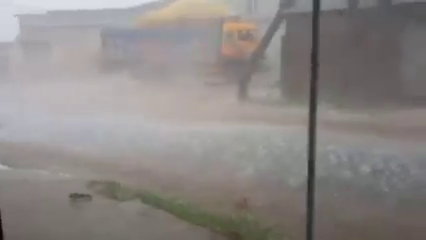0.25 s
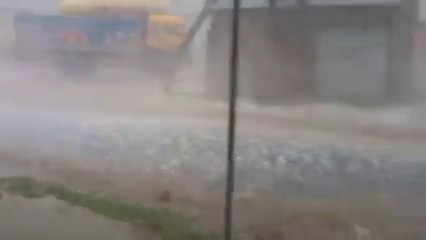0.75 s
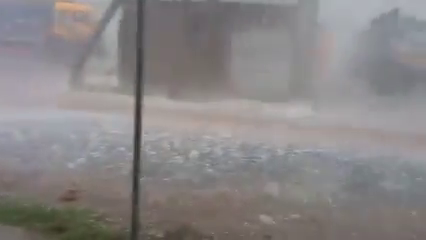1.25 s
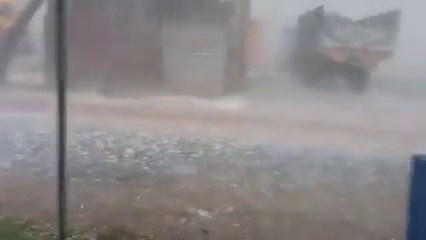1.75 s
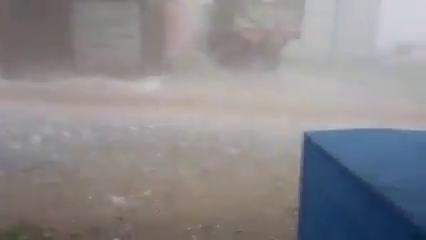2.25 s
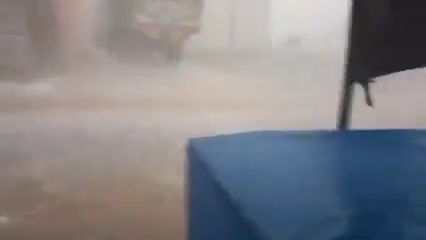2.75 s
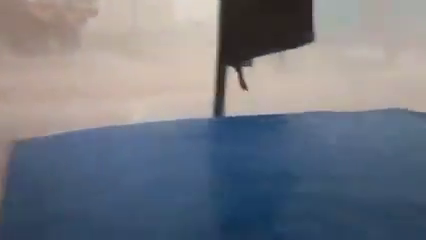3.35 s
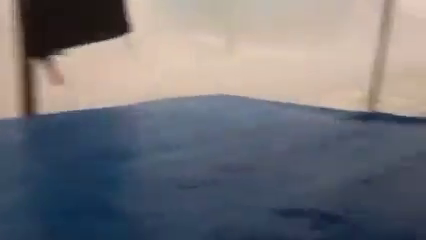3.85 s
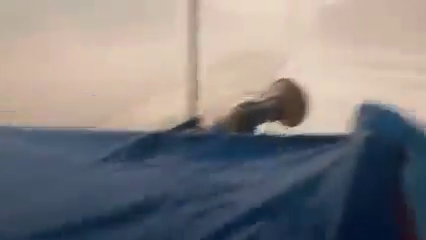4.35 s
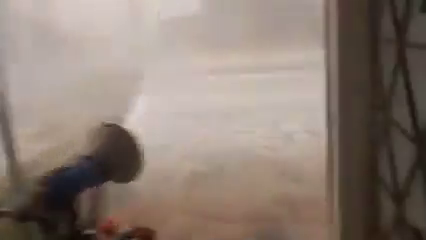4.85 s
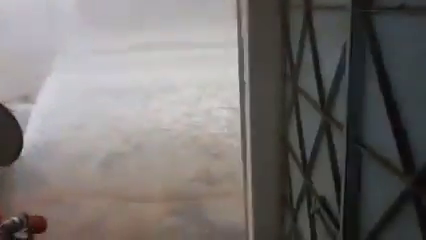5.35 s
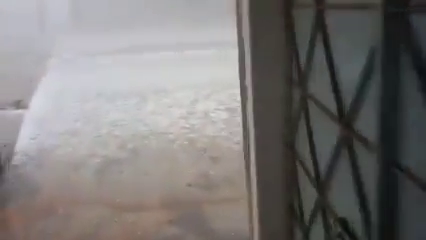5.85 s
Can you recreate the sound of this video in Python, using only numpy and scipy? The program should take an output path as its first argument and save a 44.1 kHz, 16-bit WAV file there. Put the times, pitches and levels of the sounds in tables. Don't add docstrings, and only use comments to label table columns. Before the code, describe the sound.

Torrential hail and rain roar on a yard and sheet roof, with dull knocks, sharp icy cracks and wind buffeting the microphone.

```python
import sys
import numpy as np
from scipy import signal
from scipy.fft import rfft, irfft, dct, next_fast_len
from scipy.io import wavfile
from scipy.ndimage import uniform_filter1d, minimum_filter1d

SR = 44100
rng = np.random.default_rng(int(sys.argv[2]) if len(sys.argv) > 2 else 0)


def gain_from_db(level_db):
    decades = np.asarray(level_db, float) / 20
    return 10 ** decades


def int16_out(signal):
    q = np.round(np.clip(np.atleast_2d(signal).T, -1, 1) * 32767)
    wavfile.write(sys.argv[1], SR, q.astype(np.int16))


N = 268128
PADDED = next_fast_len(N + SR // 8)
HZ = np.maximum(np.fft.rfftfreq(PADDED, 1 / SR), 1)

# [f/Hz, density/dB per Hz]
ROAR_COLOUR = [(88, -40), (150, -6), (174, -8), (246, -5), (364, -3), (929, -6), (1250, -3.5), (1520, -2),
               (1760, -2.5), (2040, -2), (2370, -5.5), (3450, -12.5), (7600, -21), (9880, -51.5),
               (16700, -120)]


def rms_one(x):
    return x / np.sqrt(np.mean(x ** 2) + 1e-20)


def in_time(rows):
    s, *columns = np.transpose(rows)
    return [np.interp(np.arange(N) / SR, s, c) for c in columns]


def at_hz(points, hz):
    table = np.array(points)
    return np.interp(np.log(hz), np.log(table[:, 0]), table[:, 1])


def shaped(x, gain):
    return irfft(rfft(x, PADDED) * gain, PADDED)[..., :N]


def panned(pan_db):
    return gain_from_db(np.multiply.outer([.5, -.5], pan_db))


def drift(rate_hz):
    pole = np.exp(-80 * np.pi * rate_hz / SR)
    noise = rng.standard_normal(N // 40 + 2002)
    slow = signal.lfilter([1], [1, -2 * pole, pole * pole], noise)[2000:]
    return np.interp(np.arange(N) / 40, np.arange(len(slow)), rms_one(slow))


def impacts(per_s, spread_db, channels):
    size_db = spread_db * np.minimum(rng.exponential(1, (channels, N)), 4)
    sign = rng.choice([-1, 1], (channels, N))
    struck = rng.random((channels, N)) < per_s / SR
    return gain_from_db(size_db) * sign * struck


def roof_db():
    # [f/Hz, width/Hz, lift/dB]
    resonances = [(1545, 160, 3.5), (2062, 80, 4), (252.6, 21, 2.5)]
    return sum(db / (1 + (2 * (HZ - hz) / width) ** 2) for hz, width, db in resonances)


def far_field(colour_db, per_s, spread_db, together, shared_db, own_db, flicker_hz):
    # [f/Hz, left-right likeness]
    likeness = [(60, 0.37), (130, 0.15), (290, 0.16), (640, 0.41), (1410, -0.12), (3100, 0.048),
                (6820, -0.056), (15000, 0.33)]
    # [f/Hz, left-right/dB]
    lean = [(60, 0), (110, -1.5), (200, -5), (380, -1), (700, 0.5), (1290, -2), (2380, -7), (4400, -3.5),
            (8120, 1.5), (15000, -5.5)]
    hits = rfft(impacts(per_s, spread_db, channels=2), PADDED)
    alike = np.clip(at_hz(likeness, HZ), -.9, .9)
    common = np.sqrt(1 + alike) * hits[0]
    opposed = np.sqrt(1 - alike) * hits[1] * [[1], [-1]]
    pair = (common + opposed) * gain_from_db(colour_db) * panned(at_hz(lean, HZ))
    place, out = 1.2 * np.log2(HZ / 20), 0
    for k in range(13):
        band = np.cos(np.pi / 2 * np.clip(place - k, -1, 1)) ** 2
        if np.max(colour_db[band > .5], initial=-99) > -45:
            swell_db = shared_db * together * (k / 10) ** 2 + own_db * drift(flicker_hz)
            out = out + irfft(pair * band, PADDED)[:, :N] * gain_from_db(swell_db)
    return rms_one(out)


def downpour(roar_db, pan_db, spray_db):
    # [f/Hz, density/dB per Hz]
    spray_colour = [(7550, -34), (7700, 3.5), (10500, -0.5), (10900, 0.5), (12500, 3), (15050, -1.5),
                    (15200, -2.5), (15750, -7), (15800, -70)]
    sheets = drift(13.0)
    roar = far_field(at_hz(ROAR_COLOUR, HZ) + roof_db(), per_s=14000, spread_db=2.5, together=sheets,
                     shared_db=0.88, own_db=0.78, flicker_hz=12.0)
    spray = far_field(at_hz(spray_colour, HZ), per_s=16000, spread_db=-1.5, together=sheets,
                      shared_db=0.8, own_db=1.6, flicker_hz=8.3)
    roar = gain_from_db(roar_db + 3.5) * roar * panned(pan_db + 2.5)
    return roar + gain_from_db(spray_db) * spray * panned(0.49 * pan_db - 0.6)


def wind(swing_db):
    # [f/Hz, density/dB per Hz]
    rumble_colour = [(13, -59), (22, -34), (92, 6.5), (129, 6), (173, -5), (249, -1), (400, -3.5),
                     (520, -19.5), (880, -120)]
    # [t/s, peak level/dB, left-right/dB, centre f/Hz]
    gusts = [(0.399, -11, 3.5, 358), (0.817, -11, 3.5, 370), (1.217, -17.5, -5.0, 231),
             (2.437, -13, -5, 388), (3.089, -17, -6.0, 275), (3.601, -12, -6, 410), (3.827, -8.5, 1.5, 109),
             (3.948, -10, 8, 132), (4.019, -9.5, 1.5, 431), (4.22, -13.5, 0, 225), (4.341, -12, 1.0, 105),
             (4.619, -14.5, -5, 393), (4.892, -13.5, -4, 275), (5.093, -10, 1.0, 380),
             (5.169, -13, 2.5, 345), (5.381, -9, -3, 643), (5.757, -16, -6.5, 153), (5.997, -13, 4.0, 310)]
    rise_s, fall_s = 0.016, .045
    span = 1.7
    under_peak_db = 8.5
    steady = gain_from_db(-25.5 + .8 * swing_db) * panned(-1.7 + 3.0 * drift(5.0))
    rumble = far_field(at_hz(rumble_colour, HZ), per_s=3000, spread_db=2.5, together=drift(8.0),
                       shared_db=3.5, own_db=0.2, flicker_hz=9.0)
    out = np.pad(steady * rumble, ((0, 0), (0, SR)))
    t = np.arange(SR // 4) / SR - 2 * rise_s
    shape = np.exp(-(t / np.where(t < 0, rise_s, fall_s)) ** 2)
    for s, peak_db, pan_db, hz in gusts:
        band = signal.butter(2, [hz / span, hz * span], "band", fs=SR, output="sos")
        puff = rms_one(signal.sosfilt(band, rng.standard_normal((2, len(t))))) * shape
        start = int((s - rise_s) * SR)
        out[:, start:start + len(t)] += puff * gain_from_db(peak_db - under_peak_db) * panned(pan_db)[:, None]
    return out[:, :N]


def ringing(clicks, t60):
    return signal.lfilter([1], [1, -gain_from_db(-60 / (t60 * SR))], clicks + 1e-12)


def near_stones(patter_db):
    # [t/s, crack peak level/dB, knock above crack/dB, left-right/dB]
    stones = [(0.233, -18.5, 15, -2), (0.415, -15.5, 1, 1), (1.156, -26, 12.5, 4), (1.2434, -27.5, 11, 5),
              (1.3862, -26, 22.5, -3.5), (1.5534, -15.5, 1, 1), (2.4128, -20, 15, -5),
              (3.5276, -18, 11.5, -4), (3.704, -16, 4.5, -2.5), (3.8018, -14, -3, -0.5),
              (4.3032, -23, 10, -4), (4.381, -22, 12, -4), (4.736, -20.5, 5, -1), (4.8526, -19.5, 5, 1),
              (4.9014, -21, 11, -8), (4.965, -18, 16.5, -2), (5.01, -20.5, 12, 1), (5.103, -19, 17, -4.5),
              (5.177, -22, 18.5, 0), (5.303, -23, 3, -8), (5.378, -23.5, 17.5, 1), (5.4165, -19.5, 15, 1),
              (5.4929, -22.5, 10, -13), (5.7114, -19.5, 6, -4.5), (5.7542, -13.5, 8, -1),
              (5.79, -21.5, 10.5, -5), (5.9104, -15, 10.5, 1), (5.9589, -22, 19, 0.5), (5.9798, -19, 5, -3),
              (5.995, -15, 5, -1)]
    # [t/s, peak level/dB, left-right/dB]
    heavy_stones = [(0.197, -3, -8), (1.234, -7, -9), (1.348, -5, -3), (1.425, -5, -6.5), (1.607, -1, -5.5),
                    (1.72, -5, -4), (1.813, -6, 4), (1.923, -10, -1), (2.041, -3.5, -3), (2.125, -7.5, 3),
                    (2.32, -3.5, -1), (2.941, -4.5, -6), (3.474, -11, -6), (3.514, -13, 2),
                    (4.026, 1.5, -1), (4.09, -3, -4.5), (4.649, -8, -7), (4.738, -6, -6), (4.965, -3, -1),
                    (5.01, -7, -9), (5.046, -11.5, -1), (5.177, -6, 0), (5.273, -5, 0.5), (5.312, -9.5, -1),
                    (5.374, -10, -1), (5.574, -11, -1), (5.656, -5, -1.5), (5.794, -7.5, -5),
                    (5.875, -3.5, -7.5), (6.05, -4.5, -4)]
    # [f/Hz, density/dB per Hz]
    crack_colour = [(2500, -31.5), (4000, 2), (7500, 1), (9000, -3.5), (11000, 0), (13000, 3.5), (15000, 1),
                    (15800, -1), (15900, -70)]
    patter = np.abs(impacts(per_s=30, spread_db=4.5, channels=1))
    crack = patter * gain_from_db(patter_db - 4.0) * panned(rng.normal(0, 2.5, N))
    knock = crack * gain_from_db(8.5)

    s, crack_db, knock_db, pan_db = np.transpose(stones)
    at = np.minimum((s * SR).astype(int), N - 1)
    crack[:, at] = gain_from_db(crack_db - 3.0) * panned(pan_db)
    knock[:, at] = gain_from_db(crack_db + knock_db - 7.5) * panned(pan_db)

    s, peak_db, lean_db = np.transpose(heavy_stones)
    at = np.minimum((s * SR).astype(int), N - 1)
    knock[:, at] = np.maximum(knock[:, at], gain_from_db(peak_db - 11.5) * panned(1.5 * lean_db))

    hiss = rms_one(shaped(rng.standard_normal((2, N)), gain_from_db(at_hz(crack_colour, HZ))))
    thud = rms_one(shaped(rng.standard_normal((2, N)), gain_from_db(at_hz(ROAR_COLOUR, HZ) + roof_db())))
    return hiss * ringing(crack, t60=.05) + thud * ringing(knock, t60=.08)


def scene():
    # [t/s, roar level/dB, left-right/dB]
    storm = [(0.0, -15, -3.5), (0.05, -15, -3), (0.73, -14.5, -3.5), (1.79, -17, -5.5), (1.85, -15.5, -4.5),
             (3.18, -15.5, -4.5), (3.27, -14, -3.5), (3.37, -16, -5), (4.01, -15.5, -3), (4.13, -16, -5.5),
             (4.17, -17, -4.0), (4.38, -15.5, -2.5), (4.57, -17, -4), (5.45, -18.5, -1.5),
             (5.47, -18, -2.5), (6.08, -17.5, -2.5)]
    roar_db, pan_db = in_time(storm)
    swing_db = roar_db - roar_db.mean()
    spray_db = -34 + 0.79 * swing_db
    return downpour(roar_db, pan_db, spray_db) + wind(swing_db) + near_stones(spray_db - 2.0)


def streaked(x):
    # [f/Hz, step over band rms/dB]
    coarseness = [(900, -12), (1800, 0), (2500, 4.5), (3300, 8), (5000, 8.5), (7000, 8.5), (8500, 7.5),
                  (10700, 8.5), (12000, 7.5), (15000, 8)]
    # [f/Hz, share]
    holes = [(2500, 0), (3500, .014), (7000, .022), (9500, .008), (10800, .05), (11800, .006)]
    size, wander_db, attack_db = 2048, 1.9, 5
    half = size // 2
    window = np.sin(np.pi * (np.arange(2 * size) + .5) / (2 * size))
    padded = np.pad(x, (size, 2 * size - N % size))
    frames = np.lib.stride_tricks.sliding_window_view(padded, 2 * size)[::size]
    a, b, c, d = np.split(frames * window, 4, axis=1)
    lines = dct(np.hstack([-c[:, ::-1] - d, a - b[:, ::-1]]), type=4, norm="ortho")

    treble = np.diff(frames[:, half:-half], 3, prepend=[[0, 0, 0]] * len(frames))
    power = (treble ** 2).reshape(len(frames), 16, -1).mean(axis=2)
    calm = power.max(axis=1) < gain_from_db(2 * attack_db) * np.median(power, axis=1)

    chance = rng.standard_normal((len(frames) + 1, size // 16))
    wander = np.repeat(chance[1:] + chance[:-1], 16, axis=1)
    band_rms = np.sqrt(uniform_filter1d(lines ** 2, size=48) + 1e-12)
    hz = (np.arange(size) + .5) * SR / 2 / size
    spared_db = np.where(hz > 7600, 7, 1.2) * ~calm[:, None]
    step = band_rms * gain_from_db(at_hz(coarseness, hz) + wander_db * wander - spared_db)
    kept = step * np.round(lines / step)
    kept_rms = np.sqrt(uniform_filter1d(kept ** 2, size=48) + 1e-12)
    kept *= np.minimum(band_rms / kept_rms, 2)

    draw = np.repeat(rng.random((len(frames) + 1, size // 16)), 16, axis=1)
    sounding = draw > at_hz(holes, hz)
    kept *= sounding[1:] & sounding[:-1]
    u, v = np.split(dct(kept, type=4, norm="ortho"), 2, axis=1)
    early = np.hstack([v, -v[:, ::-1]]) * window[:size]
    late = np.hstack([-u[:, ::-1], -u]) * window[size:]
    return (early[1:] + late[:-1]).ravel()[:N]


def outside(spans):
    t = np.arange(N) / SR
    return 1. - sum((t > start) & (t < end) for start, end in spans)


def hollowed(x, clear):
    # [from f/Hz, to f/Hz]
    weak_bands = [(7690, 8250), (15160, 15800)]
    for (low, high), longer in zip(weak_bands, (300, 1600)):
        shut = 1 - uniform_filter1d(minimum_filter1d(clear, size=longer), size=500)
        x = x - shut * shaped(x, (HZ > low) & (HZ < high))
    return x


def band_limit(x):
    return signal.sosfilt(signal.butter(12, 15700, fs=SR, output="sos"), x)


def record(dry):
    # [from t/s, to t/s]
    hollow_mid = [(0.0, 0.21), (0.35, 0.51), (0.56, 0.88), (1.09, 1.16), (1.19, 1.31), (1.38, 1.53),
                  (1.6, 1.78), (1.84, 2.09), (2.18, 2.21), (2.35, 2.86), (2.92, 3.01), (3.09, 3.36),
                  (3.47, 3.67), (3.77, 3.83), (4.14, 4.16), (4.28, 4.43), (4.48, 4.51), (4.58, 4.72),
                  (4.79, 4.96), (4.98, 5.1), (5.11, 5.15), (5.23, 5.36), (5.43, 5.53), (5.6, 5.66),
                  (5.78, 5.93), (5.97, 6.08)]
    low_cut = signal.butter(1, 45, "high", fs=SR, output="sos")
    left, right = signal.sosfilt(low_cut, 1.35 * np.tanh(dry / 1.35))
    mid = hollowed(streaked((left + right) / 2), outside(hollow_mid))
    side_clear = 1. * (drift(4) > .1)
    side = hollowed(streaked((left - right) / 2), side_clear)
    return band_limit(np.array([mid + side, mid - side]))


dry = scene()
out = record(dry)
int16_out(out)
```